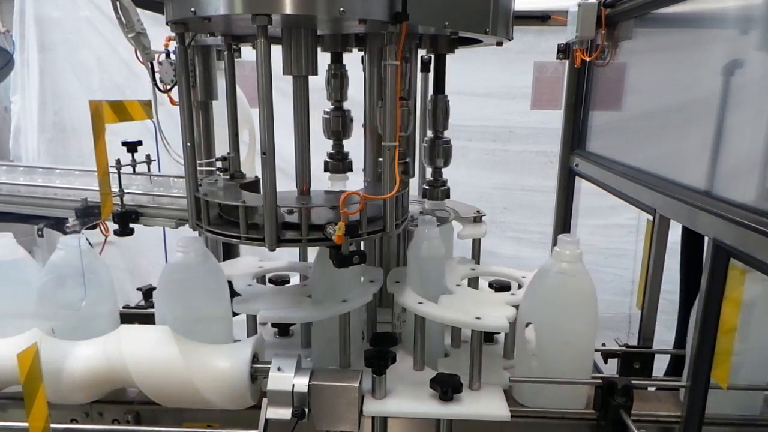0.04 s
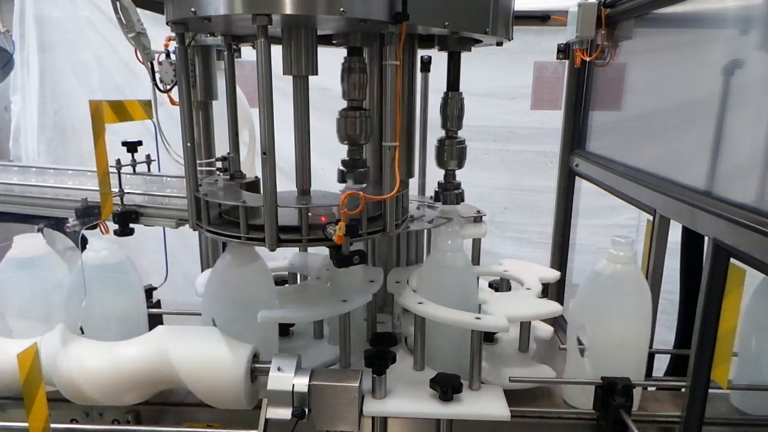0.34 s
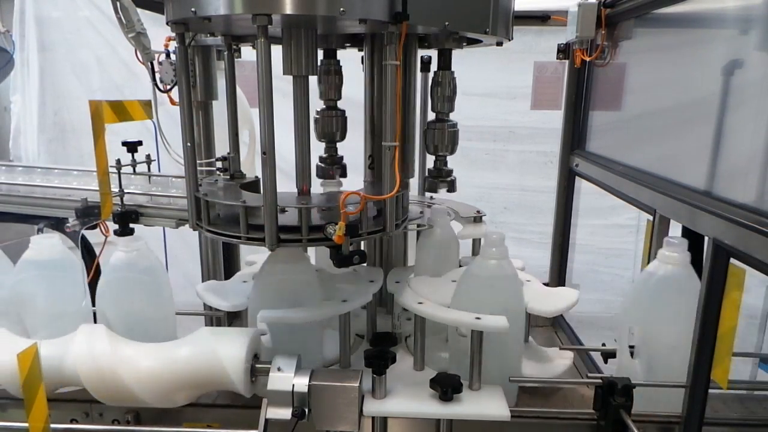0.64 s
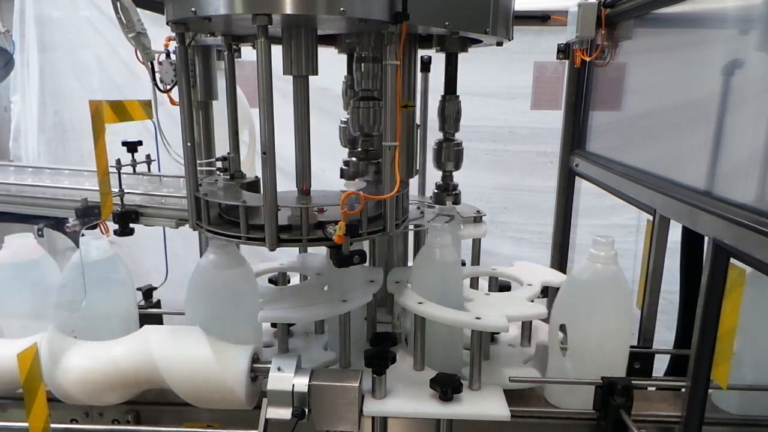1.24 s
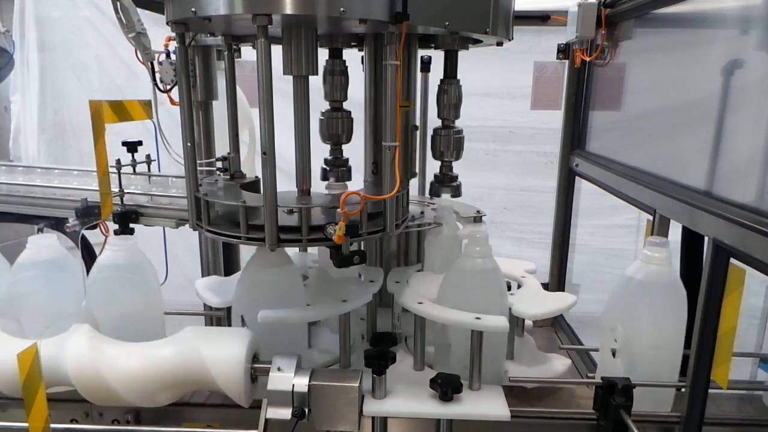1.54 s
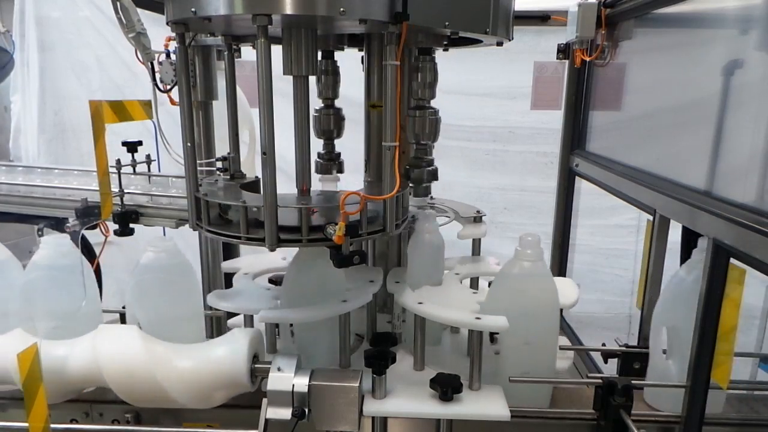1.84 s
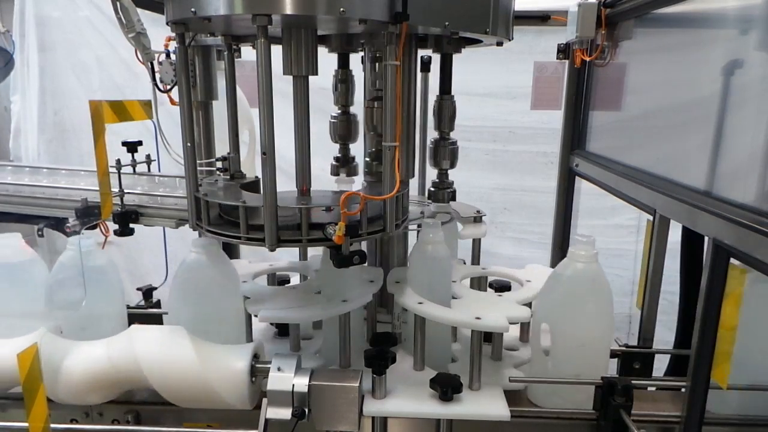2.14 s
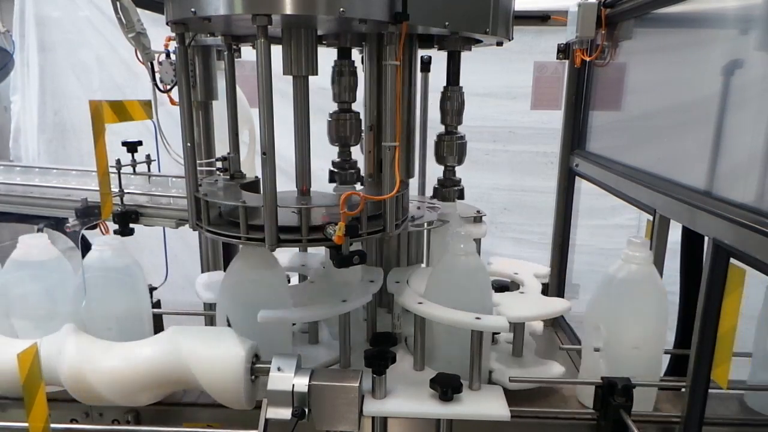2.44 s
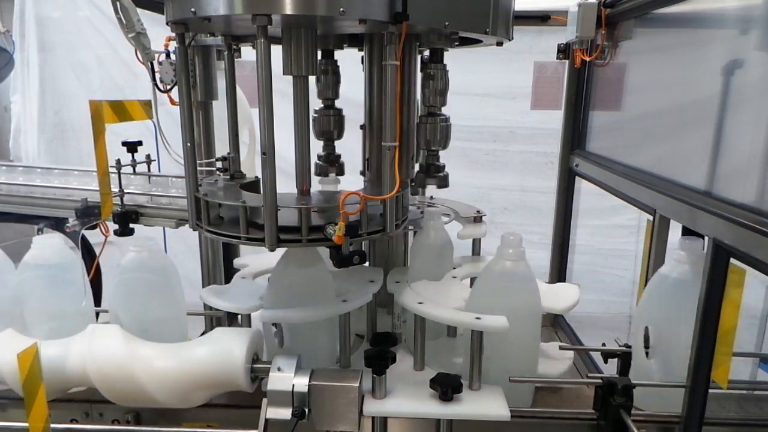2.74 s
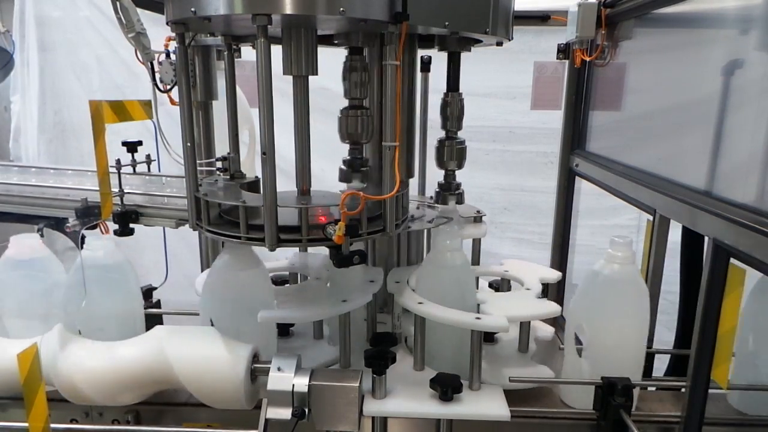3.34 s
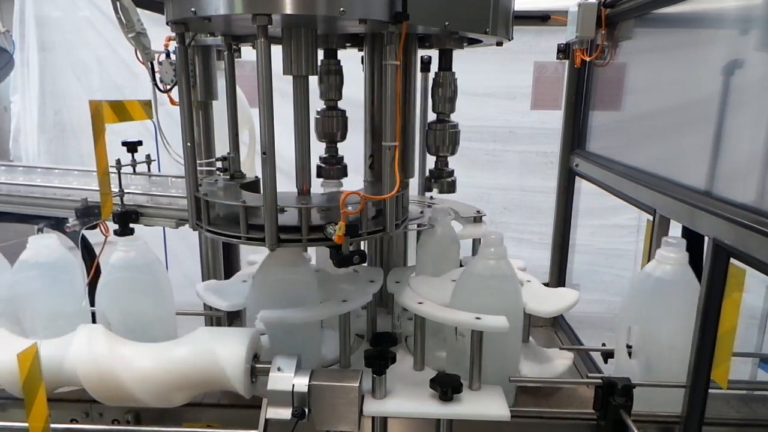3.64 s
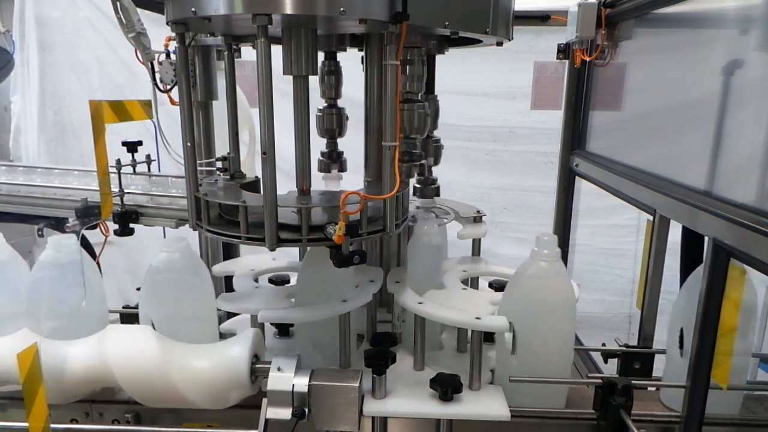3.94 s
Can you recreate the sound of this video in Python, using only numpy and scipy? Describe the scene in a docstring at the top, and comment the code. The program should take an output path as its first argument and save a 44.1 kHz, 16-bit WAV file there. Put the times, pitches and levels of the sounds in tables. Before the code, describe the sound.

A bottle capping machine runs close by in a factory, humming and rattling, with a clack about once a second and hollow plastic bottle knocks. An air puff and thin squeal come early; later a steady hiss starts.

```python
"""A motor hums over the whir and rattle of a conveyor: a rotary capping machine runs in a factory hall.
Its gears and drive whine, and empty plastic bottles knock hollowly against the guides.
Once a second a bottle passes: the turret's rumble swells and a capping head, struck and scraped, clacks.
Early on a short puff of air comes with a thin stick-slip squeal; later a steady hiss of air sets in
and bottles rub along the rail."""
import sys
import numpy as np
from scipy import signal
from scipy.fft import rfft, irfft, next_fast_len
from scipy.io import wavfile
from scipy.ndimage import uniform_filter1d, map_coordinates

SR = 44100
rng = np.random.default_rng(int(sys.argv[2]) if len(sys.argv) > 2 else 0)


def wav_record(signal):
    """Record a signal, one row per channel, as 16-bit PCM in the file named by sys.argv[1]."""
    frames = np.transpose(np.atleast_2d(signal))
    bounded = np.clip(frames, -1, 1)
    # unit amplitude maps onto the largest positive 16-bit level
    quanta = np.round(bounded * 32767).astype(np.int16)
    wavfile.write(sys.argv[1], SR, quanta)


N = 176400


def amp(db):
    """Decibels to gain."""
    return 10 ** (np.asarray(db) / 20)


def unit(x):
    """x scaled to rms 1."""
    return x / np.sqrt(np.mean(x ** 2) + 1e-20)


def clock():
    """Time of each sample in seconds."""
    return np.arange(N) / SR


def fader(points, trim_db):
    """A gain that rides through (t/s, level/dB) points, offset by a trim."""
    return amp(trim_db + np.interp(clock(), *np.transpose(points)))


def wobble(rate):
    """A smooth random curve with `rate` knots a second."""
    return map_coordinates(rng.standard_normal(4096), [clock() * rate + 2], mode="wrap")


def filtered(x, response):
    """x through an EQ whose gain is response(hz)."""
    size = next_fast_len(N + SR // 2)
    return irfft(rfft(x, size) * response(np.fft.rfftfreq(size, 1 / SR)), size)[:N]


def coloured(x, eq):
    """x through an EQ curve of (f/Hz, gain/dB) points, at rms 1."""
    f, db = np.transpose(eq)
    return unit(filtered(x, lambda hz: amp(np.interp(np.log(hz + 1), np.log(f + 1), db))))


def rush(eq, patchy_db):
    """Coloured noise at rms 1, mottled by random patches of gain in time and frequency."""
    spectrum = signal.stft(rng.standard_normal(N), nperseg=512)[2]
    patches = uniform_filter1d(rng.standard_normal(spectrum.shape), size=5, axis=0)
    patches = uniform_filter1d(patches, size=12, axis=1)
    noise = signal.istft(spectrum * amp(patchy_db * unit(patches)), nperseg=512)[1][:N]
    return coloured(noise, eq)


def tone(hz, wander_rad, rate):
    """A sine of rms 1 whose phase wanders."""
    return np.sqrt(2) * np.sin(2 * np.pi * (hz * clock() + rng.random()) + wander_rad * wobble(rate))


def swells(rows):
    """An envelope of exponential rises and falls, summed in power."""
    t = clock()
    shapes = (amp(db) * np.exp(np.minimum((t - s) / rise, (s - t) / fall)) for s, db, rise, fall in rows)
    return np.sqrt(sum(shape ** 2 for shape in shapes))


def motor():
    """A deep hum with a fifth above it, fluttering gear tones and the thin whine of the drive."""
    # loudness of the hum and of its fifth: t/s, relative level/dB
    hum_levels = [(0.0, -20.5), (0.02, -22.5), (0.52, -22), (0.56, -24.5), (1.14, -20), (1.63, -26),
                  (1.65, -22.5), (2.28, -21.5), (2.39, -29), (2.45, -21), (2.63, -25), (2.94, -20),
                  (3.15, -24.5), (3.33, -22), (3.48, -26.5), (3.63, -22), (3.99, -23.5), (4.0, -19)]
    fifth_levels = [(0.0, -30.5), (1.14, -32.5), (1.34, -44), (1.58, -26.5), (1.64, -56), (1.78, -32),
                    (1.84, -50), (1.9, -34), (2.76, -36.5), (3.04, -25.5), (3.48, -35), (4.0, -38)]
    # tones of motor and gears: f/Hz, relative level/dB, phase wander/rad
    gear_tones = [(203.2, -42, .6), (450, -45, .5), (600.4, -40, .25), (901, -46, .25), (1802.2, -35, .22),
                  (1922.6, -46, .3), (2071, -53, 1.5), (3837, -60, .4), (4505.4, -58, .4), (4940, -58, .4),
                  (5878, -60, .9)]
    # whine of the drive: f/Hz, level/dB
    drive_tones = [(7205, -65), (7779, -60), (7849, -60), (7911, -54), (8043, -55.5), (8074, -57.5),
                   (8177, -61.5), (8277, -65)]
    hum_hz, gear_flutter_db, drive_flutter_db = 101.3, 1.66, 3
    hum = fader(hum_levels, trim_db=-0.5) * tone(hum_hz, wander_rad=0.099, rate=4.9)
    fifth = fader(fifth_levels, trim_db=-0.5) * tone(1.5 * hum_hz, wander_rad=1.0, rate=8)
    gears = sum(amp(db + gear_flutter_db * wobble(rate=35)) * tone(hz, wander, rate=9)
                for hz, db, wander in gear_tones)
    drive = sum(amp(db + drive_flutter_db * wobble(rate=15)) * tone(hz, wander_rad=0.59, rate=17)
                for hz, db in drive_tones)
    return hum + fifth + amp(-1.5) * gears + drive


def conveyor():
    """A steady whir over the low thudding of the frame."""
    # colour of the whir and of the thudding: f/Hz, gain/dB
    whir_eq = [(20, -40), (35, -26), (48, -32), (62, -9.5), (90, -1.5), (135, 1), (250, -1), (380, -2),
               (540, -1.5), (700, -7.5), (1000, -9.5), (1250, -11.5), (1500, -14), (2050, -15.5),
               (2400, -17), (3200, -19.5), (4500, -24), (6000, -25), (8000, -26), (9500, -30.5),
               (12000, -35), (14400, -58)]
    thud_eq = [(20, -42), (38, -14), (58, 3), (78, 0), (130, -28), (400, -70)]
    # loudness of the thudding: t/s, relative level/dB
    thud_levels = [(0.0, -38), (0.03, -52), (0.28, -39), (1.14, -46), (1.19, -18), (1.22, -39), (1.85, -39),
                   (1.87, -34), (2.29, -43), (2.75, -47), (3.0, -36), (3.05, -46), (3.49, -48), (3.59, -39),
                   (3.66, -55), (3.79, -46), (4.0, -44)]
    whir = amp(-25 - 0.03 * wobble(rate=20)) * rush(whir_eq, patchy_db=0.52)
    thud = unit(amp(wobble(rate=5.1)) * rush(thud_eq, patchy_db=-2.5))
    return whir + fader(thud_levels, trim_db=-2.5) * thud


def rattle():
    """Chain and bottles make a dense patter of small contacts, each a fast-dying grain of noise."""
    # colour of the rattle: f/Hz, gain/dB
    rattle_eq = [(200, -48), (700, 18.5), (1500, -6), (2500, 0.5), (4000, 0), (7000, -7), (14000, -22)]
    contacts_per_s, decay_s = 110, 0.0032
    hits = rng.random(N) < contacts_per_s / SR
    strength = amp(-np.minimum(rng.exponential(size=N), 4))
    envelope = signal.lfilter([1], [1, -np.exp(-1 / (decay_s * SR))], hits * strength)
    return amp(-41.5) * coloured(envelope * rng.standard_normal(N), rattle_eq)


def bottle_knocks():
    """Empty plastic bottles bump the guides: a soft blow into two short, hollow modes."""
    # bumps: t/s, level/dB, f/Hz of the lower mode
    knocks = [(.078, -25, 557), (.443, -16.5, 745), (.474, -30, 716), (1.449, -18, 336), (1.514, -30, 490),
              (1.783, -16, 396), (2.264, -12.5, 206), (2.388, -12, 417), (2.433, -13, 540),
              (2.496, -27, 259), (2.513, -20, 523), (2.692, -17, 504), (3.454, -17.5, 847),
              (3.855, -19, 813), (3.912, -17, 488), (3.93, -15.5, 597), (3.987, -13, 426)]
    attack_s, t60_s, upper_ratio = 0.0006, 0.059, 1.7
    out, t = np.zeros(N + SR), np.arange(SR // 4) / SR
    attack = 1 - np.exp(-t / attack_s)
    for s, db, hz in knocks:
        ring = np.sin(2 * np.pi * hz * t) + amp(-13) * np.sin(2 * np.pi * hz * upper_ratio * t)
        out[round(s * SR):][:len(t)] += amp(db - 60 * t / t60_s) * attack * ring
    return out[:N]


def turret():
    """The rumble grows and ebbs as each bottle is carried through."""
    # swells of the rumble: t/s of the peak, level/dB, rise/s, fall/s
    passes = [(.45, -26, 0.088, 0.093), (.95, -32, 0.046, 0.024), (1.16, -32, 0.056, 0.1),
              (1.43, -23.5, 0.1, 0.18), (1.80, -29, 0.024, 0.028), (2.26, -26, 0.024, 0.066),
              (2.44, -21, 0.12, 0.28), (3.06, -33.5, 0.11, 0.13), (3.48, -29.5, 0.19, 0.23),
              (3.91, -29, 0.064, 0.13)]
    # colour of the rumble: f/Hz, gain/dB
    turret_eq = [(40, -49), (130, -11), (230, 3.5), (480, 5), (750, 0), (1200, -6), (1600, -7),
                 (2100, -14.5), (3500, -15), (6000, -26.5), (14000, -47)]
    return swells(passes) * rush(turret_eq, patchy_db=1.5)


def capping_heads():
    """Each clack is a blow with a short scrape that rings the head, topped by a crack of noise."""
    # blows: t/s, relative level/dB, pitch ratio, scrape decay/s, lift of the upper modes/dB
    clacks = [(.4266, -22.5, 1.06, .001, 6), (.4355, -20.5, 1.0, .001, -6), (.4435, -27, 1.0, .003, -3),
              (1.424, -28, 1.0, .003, 0), (1.435, -28, 1.0, .003, -3), (1.4438, -19, .99, .003, -4),
              (1.4470, -19, .96, .004, 9.5), (1.458, -24, .96, .003, 7), (2.4378, -21, 1.0, .001, 2),
              (2.4465, -24, 1.0, .002, -4), (2.4518, -21, 1.04, .003, -8), (2.464, -28, 1.0, .002, 0),
              (2.688, -28, 1.25, .003, -6), (3.4552, -13.8, 1.0, .0007, -1), (3.461, -26, 1.0, .003, 2),
              (3.4655, -24.5, 1.0, .003, 3)]
    # modes of a head: f/Hz, relative level/dB, t60/s
    modes = [(850, -12, .025), (1920, 2, .032), (2050, 2, .028), (2300, -12, .015), (3630, -8, .028),
             (3950, -14, .018), (4720, -11, .022)]
    upper_hz, crack_top_hz = 3000, 5000
    out, t = np.zeros(N + SR), np.arange(SR // 8) / SR
    soften = signal.butter(4, crack_top_hz, fs=SR)
    for s, db, pitch, scrape_s, lift_db in clacks:
        ring = sum(amp(level + lift_db * (hz > upper_hz) - 60 * t / t60)
                   * np.sin(2 * np.pi * hz * pitch * t) for hz, level, t60 in modes)
        attack = 1 - np.exp(-t / (0.2 * scrape_s))  # the ring builds over a fifth of the scrape
        scrape = rng.standard_normal(len(t)) * np.exp(-t / scrape_s)
        blow = (t == 0) + amp(-14) * scrape / np.linalg.norm(scrape)
        clack = signal.fftconvolve(ring * attack, blow)[:len(t)]
        crack = amp(-12.5) * signal.lfilter(*soften, scrape)
        out[round(s * SR):][:len(t)] += amp(db + 4.5) * (clack / np.abs(clack).max() + crack)
    return out[:N]


def hall(x):
    """The hall answers x with a short, diffuse tail."""
    t60_s, wet_db = 0.3, -13
    tail = rng.standard_normal(N) * amp(-60 * clock() / t60_s)
    return x + amp(wet_db) * signal.fftconvolve(x, tail / np.linalg.norm(tail))[:N]


def air_puff():
    """One bright puff of air opens fast, holds with a slight arch and dies away."""
    # colour of the puff: f/Hz, gain/dB
    puff_eq = [(2000, -8), (5000, -1), (8000, -3.5), (10000, -5), (10900, -1), (11700, 1), (12300, -2.5),
               (14400, -13)]
    open_s, rise_s, hold_s, fall_s = 0.434, 0.012, 0.11, 0.046
    t = clock() - open_s
    valve = np.exp(np.minimum(t / rise_s, (hold_s - t) / fall_s).clip(max=0))
    arch_db = 2.5 * np.sin(np.pi * np.clip(t / hold_s, 0, 1))
    return amp(-35 + arch_db) * valve * rush(puff_eq, patchy_db=2.0)


def squeal():
    """A thin squeal in rough stick-slip chirps; its whistling octave fades first."""
    # slips: t/s, level/dB, Gaussian half length/s
    slips = [(0.462, -32.5, 0.0063), (0.487, -29, 0.0061), (.511, -34, 0.0042), (0.53, -44, 0.0044),
             (0.547, -38, 0.0064), (.566, -33, 0.0033), (.582, -40, .008), (0.607, -41, 0.009),
             (0.64, -41, 0.012), (0.671, -37, .006), (0.691, -37, 0.0045), (.715, -50, .01)]
    # loudness of the octave whistle: t/s, level/dB
    whistle_levels = [(.435, -60), (.465, -32), (.502, -31.5), (.525, -52), (.58, -53), (.85, -70)]
    squeal_hz, flutter_db, whistle_hz, half_width_hz = 5880, 3.5, 11820, 88
    chirps = sum(amp(db) * np.exp(-((clock() - s) / half) ** 2 / 2) for s, db, half in slips)
    rough_tone = unit(amp(flutter_db * wobble(rate=280)) * tone(squeal_hz, wander_rad=1.2, rate=65))
    whistle = filtered(rng.standard_normal(N), lambda hz: 1 / (1 + ((hz - whistle_hz) / half_width_hz) ** 2))
    times, levels = np.transpose(whistle_levels)
    whistle_gain = np.interp(clock(), times, amp(levels), left=0, right=0)
    return chirps * rough_tone + whistle_gain * unit(whistle)


def air_hiss():
    """A hiss of air opens and stays on, wavering in level."""
    # loudness of the hiss: t/s, relative level/dB
    hiss_levels = [(2.28, -43), (2.816, -44), (2.858, -41), (2.874, -47.5), (3.324, -42.5), (3.424, -46),
                   (3.586, -38.5), (3.658, -45), (3.736, -40.5), (3.96, -42.5), (4.0, -40)]
    # colour of the hiss: f/Hz, gain/dB
    hiss_eq = [(800, -34), (2500, 1.5), (4000, 1), (6500, 3), (9000, 0.5), (12000, 0), (14400, -6.5)]
    start_s, rise_s = 2.21, 0.049
    opening = np.clip((clock() - start_s) / rise_s, 0, 1)
    return opening * fader(hiss_levels, trim_db=5.5) * rush(hiss_eq, patchy_db=2.5)


def rail_rubs():
    """Bottles rub along the guide rail in swells of midrange noise."""
    # rubs: t/s of the peak, level/dB, rise/s, fall/s
    rubs = [(2.85, -34, .2, .12), (3.32, -32, 0.043, 0.075), (3.52, -31.5, 0.088, 0.045),
            (3.87, -30.5, 0.031, 0.11)]
    # colour of the rubbing: f/Hz, gain/dB
    rail_eq = [(300, -30), (600, -8), (830, 0), (1250, -3), (1700, -7), (4000, -32)]
    return swells(rubs) * rush(rail_eq, patchy_db=-0.5)


def scene():
    """The whole machine from close by, in mono; only the clacks feed the hall."""
    machinery = motor() + conveyor() + rattle() + turret()
    bottles = rail_rubs() + bottle_knocks()
    return (machinery + bottles + hall(capping_heads()) + air_puff() + air_hiss() + squeal())[None]


def record(dry):
    """A brick-wall low-pass takes off the very top of the treble."""
    top_hz = 14450
    return np.array([filtered(channel, lambda hz: hz < top_hz) for channel in dry])


dry = scene()
out = record(dry)
wav_record(out)
```